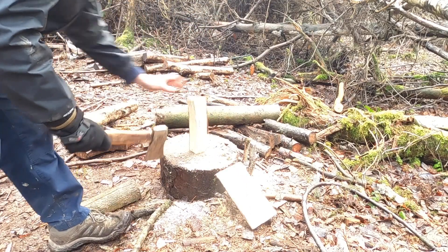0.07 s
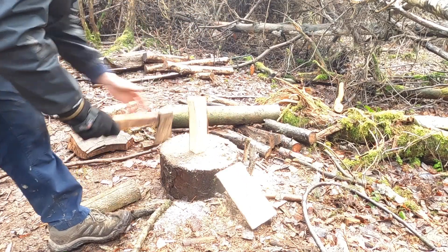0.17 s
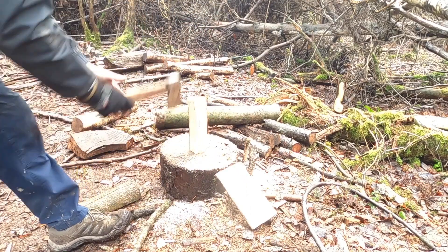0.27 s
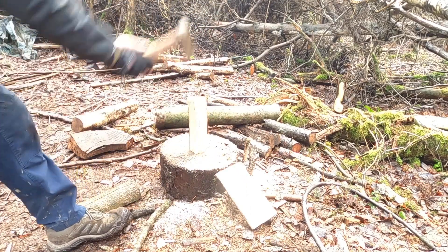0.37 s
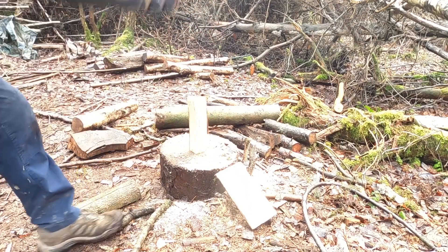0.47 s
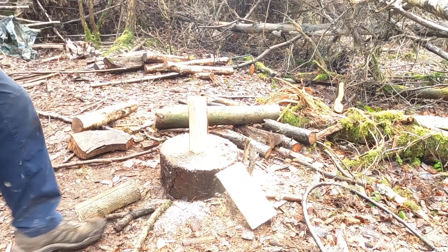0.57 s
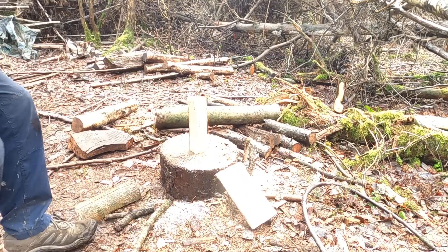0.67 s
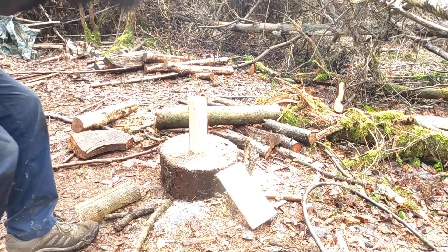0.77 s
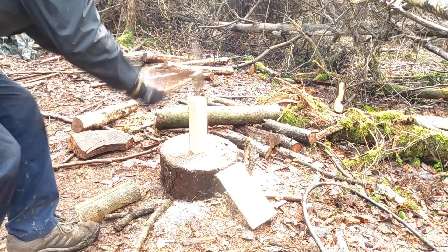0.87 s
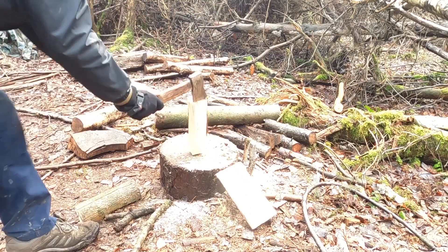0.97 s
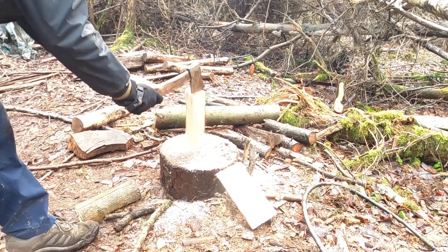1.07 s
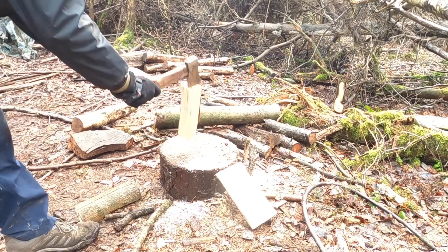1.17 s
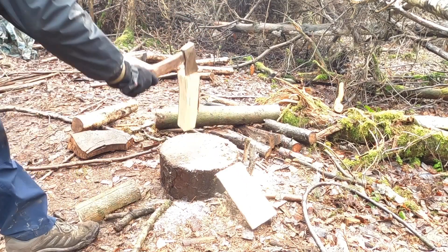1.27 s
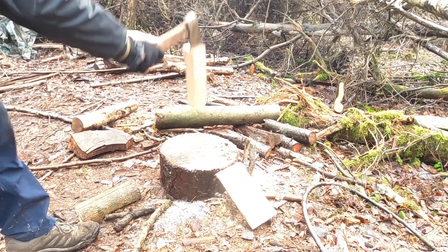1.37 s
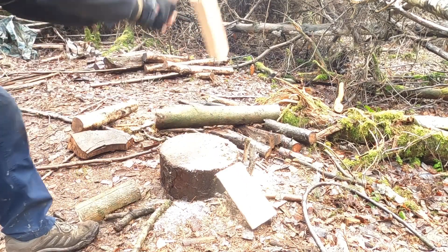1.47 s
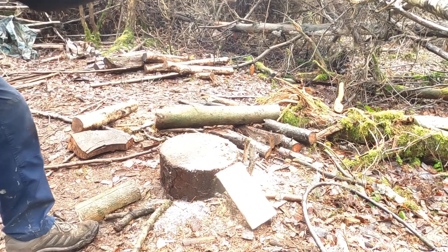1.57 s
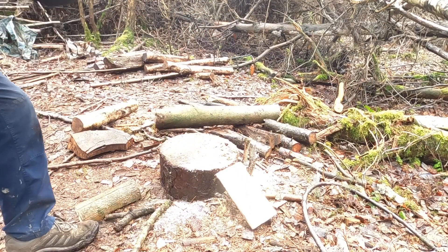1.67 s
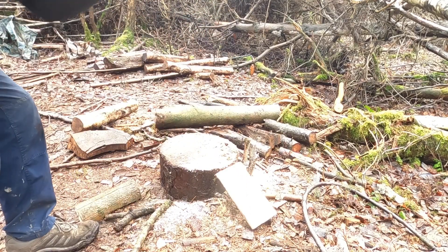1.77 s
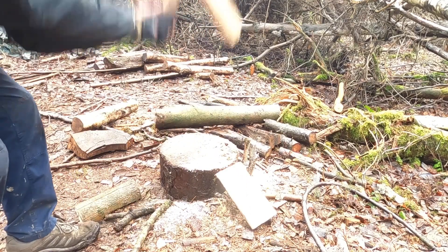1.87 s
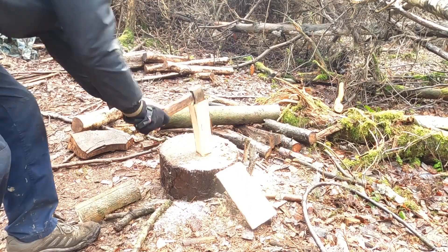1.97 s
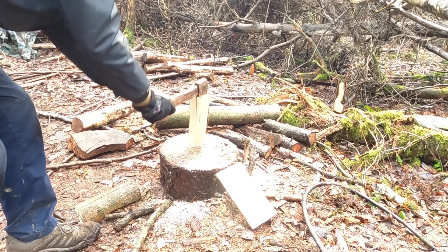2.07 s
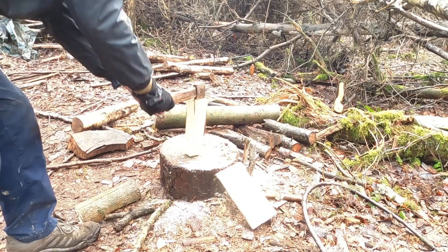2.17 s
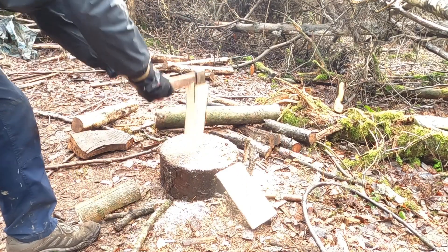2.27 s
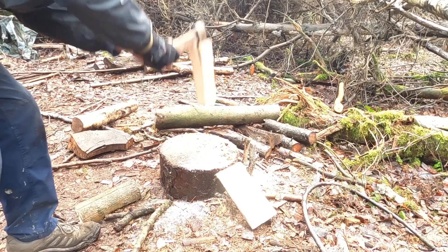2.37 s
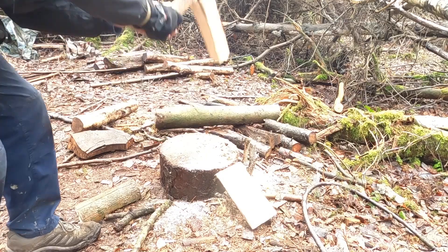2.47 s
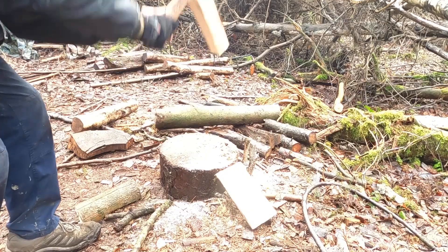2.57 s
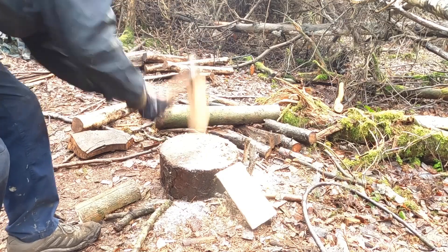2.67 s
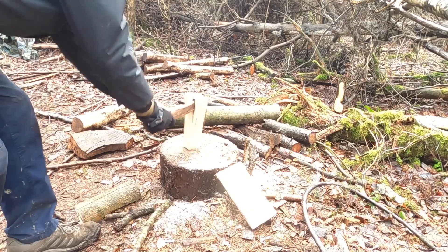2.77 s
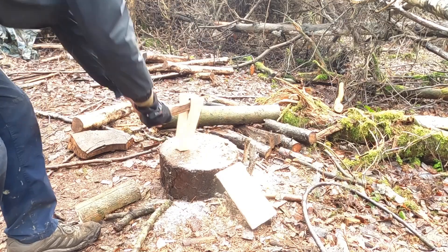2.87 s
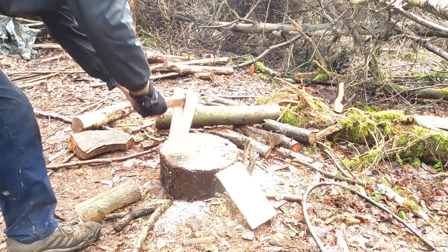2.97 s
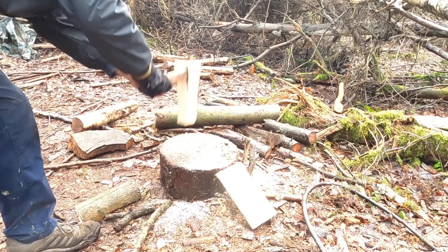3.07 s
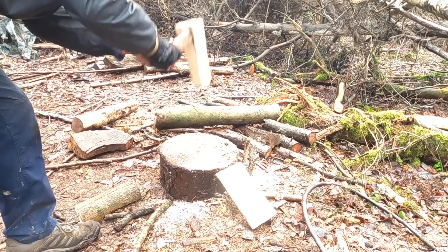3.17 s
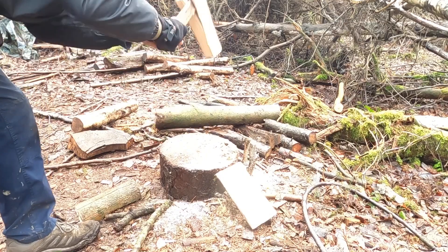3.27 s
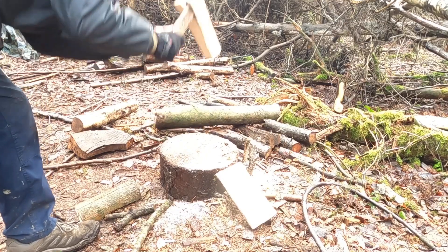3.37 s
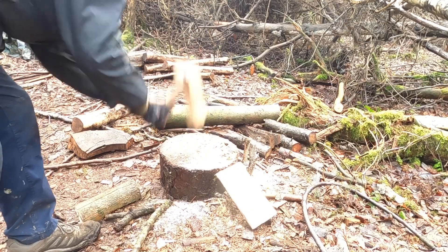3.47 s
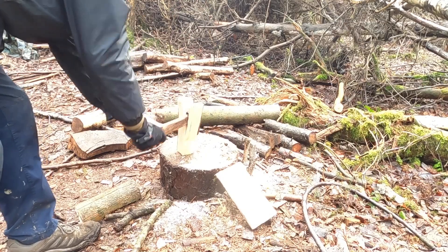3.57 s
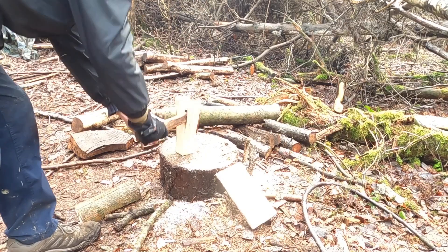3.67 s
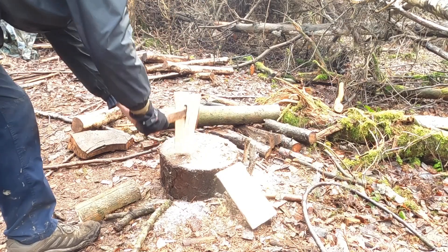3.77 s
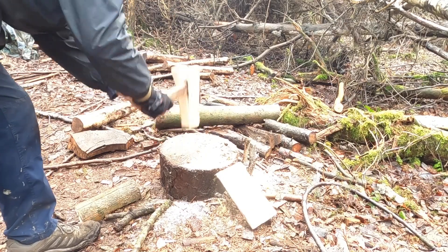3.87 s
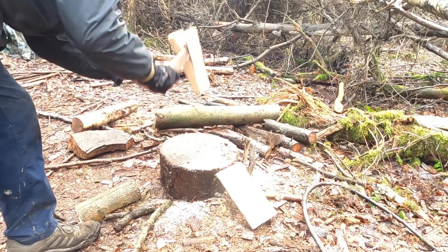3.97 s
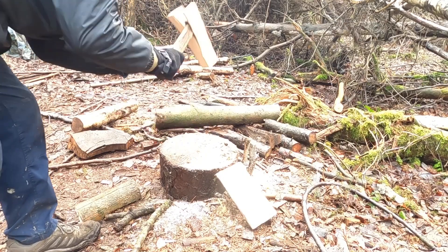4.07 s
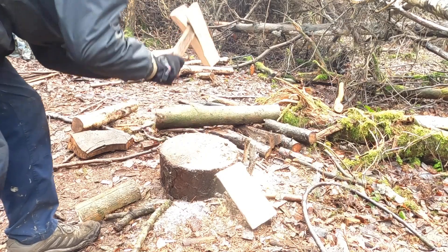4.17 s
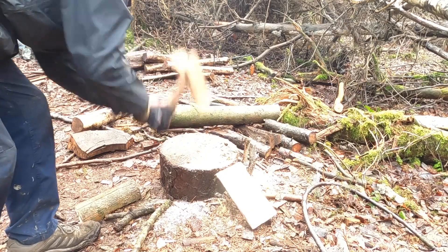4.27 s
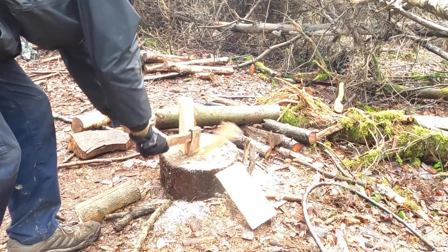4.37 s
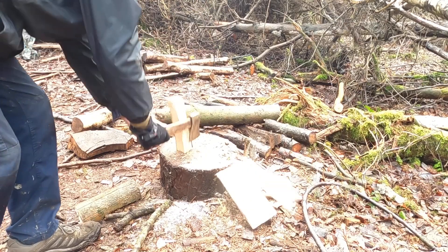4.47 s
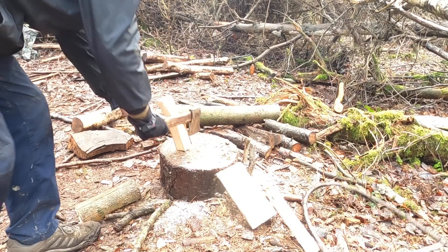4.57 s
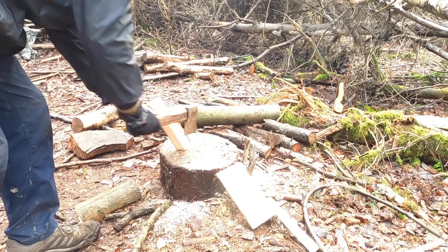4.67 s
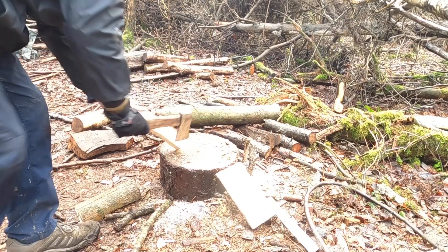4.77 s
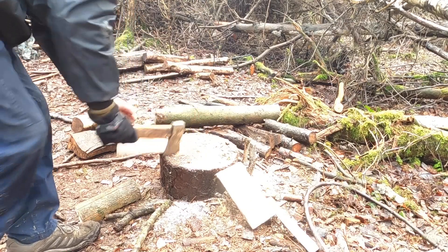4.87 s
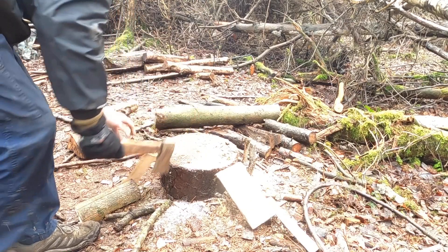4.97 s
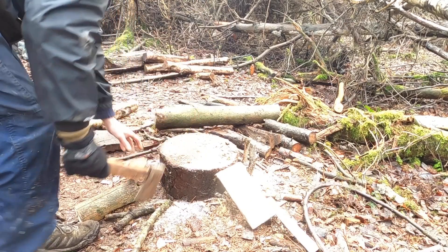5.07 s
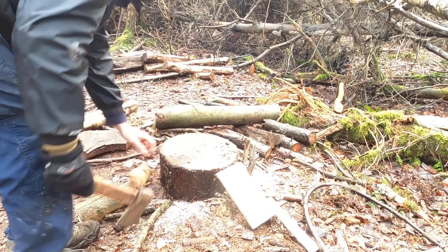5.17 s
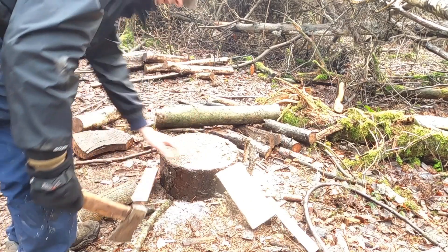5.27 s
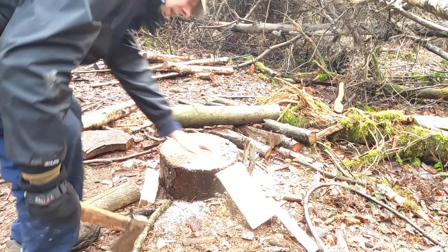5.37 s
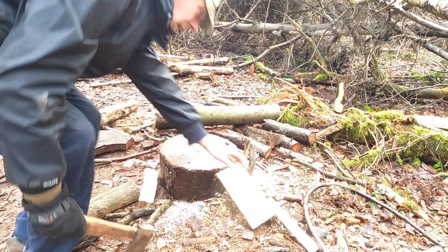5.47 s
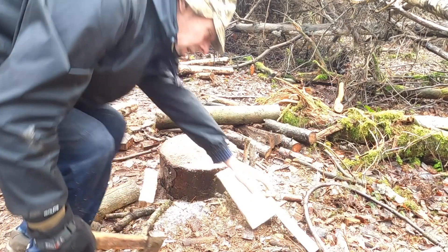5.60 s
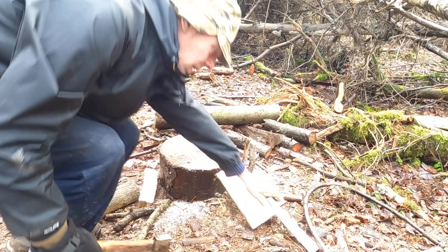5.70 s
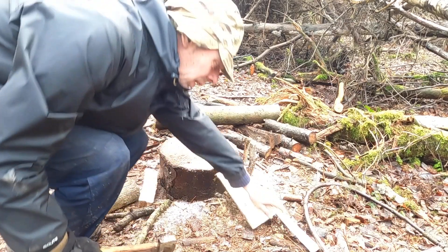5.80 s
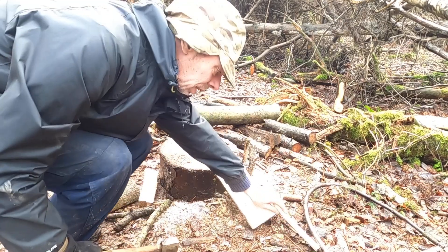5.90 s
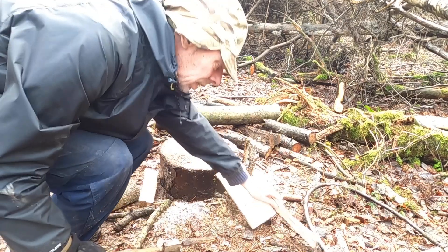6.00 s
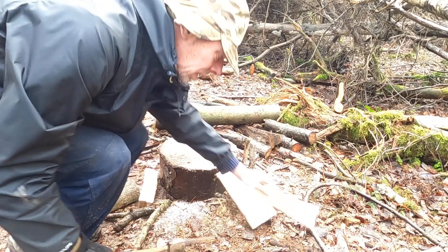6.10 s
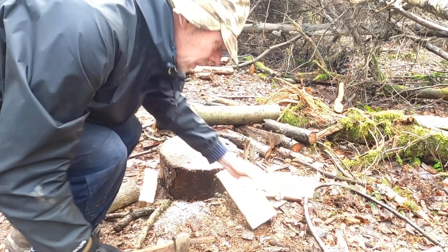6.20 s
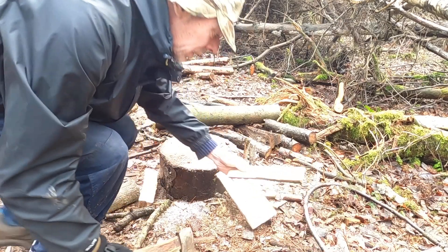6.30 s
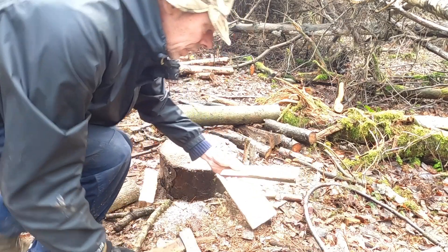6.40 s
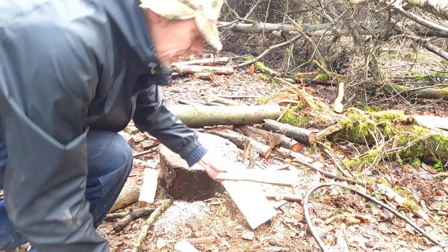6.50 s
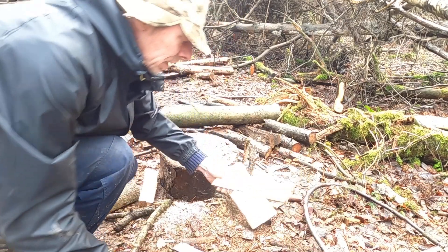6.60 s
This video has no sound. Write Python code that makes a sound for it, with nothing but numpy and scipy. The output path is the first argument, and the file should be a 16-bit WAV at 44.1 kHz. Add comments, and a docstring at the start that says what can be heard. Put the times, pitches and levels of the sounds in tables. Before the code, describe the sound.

Close outdoor sound of an axe splitting dry wood on a log block. A jacket and dead leaves rustle, then five hard, cracking chops fall just under a second apart, each with a low thud and soft return from the trees. After the last, kindling clatters down, the axe is laid aside with a dull knock, and sticks scrape lightly.

```python
"""A jacket and dead leaves rustle over still woodland air and a low rumble, drawn as coloured noise.
An axe then splits a dry billet on a log block: five sharp chops, each a sum of damped modes with a crack of
noise, a thud of the block and a soft return from the trees. Kindling drops and the axe is laid down, as further
damped modes, amid filtered-noise snaps and scrapes. The close microphone overloads on every chop: a limiter
ducks the surroundings for a moment and the remaining peaks are flattened."""
import sys
import numpy as np
from scipy import signal
from scipy.fft import rfft, irfft, next_fast_len
from scipy.io import wavfile
from scipy.ndimage import uniform_filter1d, minimum_filter1d

SR = 44100
rng = np.random.default_rng(int(sys.argv[2]) if len(sys.argv) > 2 else 0)


def master_out(mix):
    """Clip the mix to full scale and print it as 16-bit PCM to the path in sys.argv[1]."""
    frames = np.transpose(np.atleast_2d(mix))
    ceiling = np.clip(frames, -1, 1)
    pcm = np.round(ceiling * 32767).astype(np.int16)
    wavfile.write(sys.argv[1], SR, pcm)


N = 292779

# All levels are relative; the functions that use them may add further gain.
# Shifts of the body: peak t/s, swell/s, fade/s, rustle level/dB, low bump level/dB
BODY_SHIFTS = [(.08, .1, 0.048, -71, -50.5), (0.519, 0.26, 0.17, -61, -43.5),
               (.83, 0.051, 0.062, -58.5, -48), (1.63, 0.039, 0.046, -64, -52),
               (1.85, 0.069, 0.16, -65.5, -51.5), (2.411, 0.095, 0.051, -75, -76),
               (2.93, 0.074, 0.12, -72, -74), (5.33, 0.065, 0.12, -66.5, -57), (5.72, 0.14, 0.15, -67, -54),
               (6, 0.043, 0.036, -81, -47.5), (6.49, 0.048, 0.061, -63, -45)]
# Before each blow the sleeve swells and air is pushed ahead: time constant/s, level/dB
SWING_S, SWING_RUSTLE_DB = 0.044, -62
PUSH_S, PUSH_DB = 0.11, -51.5
# Floors between movements
REST_RUSTLE_DB, REST_RUMBLE_DB = -79, -55.5
# Woodland air over time: t/s, level/dB
AIR_ENVELOPE = [(0, -55.5), (.55, -53), (.87, -53), (1.1, -63), (1.85, -56.5), (2.3, -62.5), (4.2, -65),
                (4.9, -62.5), (5.35, -57.5), (6.64, -57)]
# Noise spectra of cloth and leaves, air, low rumble and breaking wood: f/Hz, level per Hz/dB
RUSTLE_SPECTRUM = [(200, -13.5), (900, 4), (2000, 5), (4000, 0.5), (7700, -1.5), (8300, -12.5),
                   (12000, -22.5), (16000, -44.5)]
AIR_SPECTRUM = [(60, 5.5), (160, 4.5), (350, 3), (1100, 1), (2000, -7), (3500, -13), (8000, -20),
                (16000, -58)]
RUMBLE_SPECTRUM = [(15, -5.5), (35, 4), (65, 2.5), (100, -4.5), (160, -14.5), (300, -23), (1000, -61.5)]
CRACK_SPECTRUM = [(200, 1.5), (700, -6.5), (1500, 10), (4000, 0), (7400, -5), (8600, -14.5), (12000, -21.5),
                  (16000, -41)]
# The two microphone ports: f/Hz, phase by which left lags right/rad, left minus right level/dB
PORT_RESPONSE = [(100, .08, -1), (1000, 0.27, 1.3), (2000, 0.57, 2.34), (4150, 0.7, 2.5), (7000, 0.93, -5),
                 (11900, 1.2, -2.5)]
# Fibres snapping, twigs and leaves ticking: t/s, level/dB, t60/s
SNAP_EVENTS = [(0.311, -44, 0.0089), (2.7207, -2, 0.0045), (2.98, -41, .006), (3.099, -43, 0.0055),
               (3.237, -50, 0.0041), (3.5301, 1.5, 0.0077), (5.095, -47, 0.029), (5.723, -50, .008),
               (5.838, -40, 0.014), (5.893, -47, 0.021), (6.243, -45, 0.012), (6.409, -44, 0.014),
               (6.497, -35, 0.0062), (6.623, -32, 0.0019)]
# A shoe scuffing, wood and steel sliding: t/s, length/s, level/dB, centre f/Hz, width/Hz
SCRAPE_STROKES = [(.41, 0.21, -54, 393, 259), (4.92, 0.029, -55, 6420, 1400),
                  (5.082, 0.061, -60, 3650, 1520), (5.096, 0.26, -63.5, 2663, 257),
                  (5.118, 0.27, -64, 1960, 259), (6.001, 0.01, -60, 1880, 400),
                  (6.002, .05, -66.5, 3200, 396), (6.229, 0.041, -48.5, 2930, 880),
                  (6.26, 0.055, -65, 3330, 890), (6.458, 0.095, -57, 2960, 2500)]
# Axe blows: t/s, blow level/dB, billet f/Hz, ring t60/s, low, middle and upper mode levels/dB,
# crack level/dB, crack t60/s, echo level/dB
AXE_BLOWS = [(0.9012, 16.5, 1815, 0.012, 4, -11.5, 2.5, 6.5, 0.014, 8),
             (1.977, 15.5, 1825, 0.014, 3, -0.5, -4.5, -1.5, 0.018, 4.5),
             (2.7180, 14, 1900, 0.0093, 0, 1, -11, 0.5, 0.018, 3.5),
             (3.5290, 12, 1947, 0.015, -1, -2.5, 2.5, 2.5, 0.013, 8),
             (4.342, 7.5, 2045, 0.017, 6.5, 4, -8.5, 0, 0.014, 8)]
# Billet modes: frequency ratio, level/dB, share of the ring t60
BILLET_MODES = [(.53, -9, .8), (.63, -7.5, 0.93), (.72, -7, 0.88), (.82, -5, 0.89), (1, -1, .88),
                (1.14, -7, 0.88), (1.31, -14.5, 0.923), (1.78, -15.5, .7), (2.07, -14, 0.5),
                (2.55, -14, .5), (3.3, -23, 0.49)]
# Weight landing on block or ground: t/s, level/dB, f/Hz, t60/s, overtone level/dB, crunch level/dB
LANDINGS = [(0.9055, 2.5, 82.4, 0.074, -9, -13.5), (0.964, -23.5, 80.7, 0.19, -20, -49),
            (1.978, -9, 89.6, 0.11, 3.5, -16.5), (2.719, -14.5, 84.7, 0.11, 6.5, -19),
            (3.5311, -11.5, 94.6, 0.12, 1, -14), (4.3444, -8, 89, 0.091, 1, -15),
            (4.573, -31.5, 94.8, 0.075, -20, -37.5), (4.985, -25, 67, 0.063, -26, -68)]
# Modes of the block on soft ground: frequency ratio, level/dB, share of the t60
BLOCK_MODES = [(1, -0.5, 0.96), (2.05, 1, 0.39), (2.7, -1, 0.54), (3.8, -6, 0.36), (5.2, 0.5, 0.21)]
# Scatter from the trees: f/Hz, level/dB, t60/s
TREE_BANDS = [(350, -17, 1.2), (697, -12.5, 1.1), (1240, -10.5, 1.3), (1900, -4, 1.16), (3180, -14.5, 0.84),
              (4690, -22.5, 0.95), (6020, -36, 1.6)]
# Lighter knocks: t/s, thud level/dB, thud f/Hz, stick level/dB, brightest f/Hz, fall-off/(dB per octave),
# stick frequency factor, axe level/dB, tick level/dB
KNOCK_EVENTS = [(2.884, -24.5, 264, -39.5, 1560, 4, .9, -57, -43),
                (3.682, -24, 254.5, -36.5, 1173, 5.5, .9, -83.5, -53),
                (4.371, -8.5, 192.6, -18.5, 900, 7, 1.26, -44, -46),
                (4.544, -17.5, 450, -14, 1255, 6, 1.012, -69, -23.5),
                (4.671, -33.5, 405, -25, 1370, 15.5, 1.05, -75.5, -43.5),
                (4.9789, -43.5, 390, -26.5, 2150, 15, 1.34, -73.5, -38.5),
                (5.214, -30, 470, -50.5, 580, 7.5, 1.6, -62.5, -63),
                (5.278, -20.5, 313, -28, 716, 16, 0.81, -42, -45),
                (6.002, -31.5, 354, -41, 1970, 14, 1.34, -64.5, -61),
                (6.248, -71.5, 300, -33, 2700, 19, 1, -75.5, -45)]
# Modes of a loose stick: f/Hz, level/dB, t60/s
STICK_MODES = [(541.6, -6.5, 0.06), (589.6, -4.5, 0.09), (1028, -1, 0.022), (1101.7, -3.5, 0.02),
               (1392, -8, 0.029), (1596, -7.5, 0.026), (2326, -4, 0.025), (2740, -14, 0.037),
               (3050, -10, 0.05), (3548, -12.5, 0.041), (4870, -38, 0.019)]
# Modes of axe head and handle: f/Hz, level/dB, t60/s
AXE_MODES = [(540, -7, 0.11), (755, 7.5, 0.07), (1850, 3, 0.12), (1917, -0.5, .05), (2060, 1, 0.11),
             (2710, -17.5, 0.062)]
CUTOFF_HZ = 16200  # stopband edge of the final low-pass


def from_db(db):
    """Amplitude ratio: 20 dB is a factor of ten."""
    return 10 ** (np.asarray(db) / 20)


def rms_one(x):
    """Normalisation to unit root-mean-square."""
    return x / np.sqrt(np.mean(x ** 2) + 1e-20)


def ages():
    """Time axis of half a second from the onset of an event."""
    return np.arange(SR // 2) / SR


def fade(t60):
    """Exponential decay: the amplitude falls by 60 dB in t60."""
    return 1000.0 ** (-ages() / t60)


def ring(hz, t60):
    """Free vibration of one struck mode: a damped sinusoid."""
    return np.sin(2 * np.pi * hz * ages()) * fade(t60)


def add(track, s, sound):
    """Superposition: a sound is summed into the track from time s."""
    start = int(round(s * SR))
    track[start:start + len(sound)] += sound[:N - start]


def band_pass(x, low_hz, high_hz):
    """Band limitation by a Butterworth filter."""
    band = [low_hz, min(high_hz, .45 * SR)]
    return signal.sosfilt(signal.butter(2, band, "band", fs=SR, output="sos"), x)


def noise(spectrum, size=N):
    """Spectral shaping: white noise is weighted by a level curve over log frequency, then set to rms 1."""
    hz, db = np.transpose(spectrum)
    freqs = np.maximum(np.fft.rfftfreq(size, 1 / SR), 1)
    weight = from_db(np.interp(np.log(freqs), np.log(hz), db))
    white = rng.standard_normal(size)
    return rms_one(irfft(rfft(white) * weight, size))


def drift(rate):
    """Random modulation: straight lines join unit-variance values drawn at this rate per second."""
    return np.interp(np.arange(N) / SR * rate, np.arange(N // 10), rng.standard_normal(N // 10))


def burst(t60):
    """Fracture: breaking wood fibres give broadband noise with exponential decay."""
    return noise(CRACK_SPECTRUM, size=SR // 2) * fade(t60)


def at_ports(x):
    """Interaural-type difference: the left port lags in phase and the housing colours each side."""
    hz, lag, tilt_db = np.transpose(PORT_RESPONSE)
    size = next_fast_len(N + SR // 10)
    freqs = np.fft.rfftfreq(size, 1 / SR)
    # each port takes half the difference, with opposite sign
    gain = from_db(np.interp(freqs, hz, tilt_db) / 2)
    left = gain * np.exp(-.5j * np.interp(freqs, hz, lag))
    return irfft(rfft(x, size) * np.array([left, 1 / left]), size)[:, :N]


def spread(spectrum, width):
    """Partial coherence: a common noise plus an independent one in opposite phase at the two ports."""
    common = at_ports(noise(spectrum))
    return common + width * noise(spectrum) * np.array([[1], [-1]])


def swell_at(s, rise_s, fall_s):
    """Gaussian envelope of height 1 with separate widths before and after its peak."""
    t = np.arange(N) / SR - s
    return np.exp(-.5 * (t / np.where(t < 0, rise_s, fall_s)) ** 2)


def movement(stop_s=.01):
    """Power addition: rest, shifts of the body and swings set the rustle and rumble amplitudes."""
    rustle_power = from_db(REST_RUSTLE_DB) ** 2
    rumble_power = from_db(REST_RUMBLE_DB) ** 2
    for s, rise_s, fall_s, rustle_db, bump_db in BODY_SHIFTS:
        shape = swell_at(s, rise_s, fall_s)
        rustle_power = rustle_power + (from_db(rustle_db) * shape) ** 2
        rumble_power = rumble_power + (from_db(bump_db) * shape) ** 2
    for s, *_ in AXE_BLOWS:
        sleeve = swell_at(s, SWING_S, stop_s)
        push = swell_at(s, PUSH_S, stop_s)
        rustle_power = rustle_power + (from_db(SWING_RUSTLE_DB) * sleeve) ** 2
        rumble_power = rumble_power + (from_db(PUSH_DB) * push) ** 2
    return np.sqrt(rustle_power), np.sqrt(rumble_power)


def surroundings(rustle_db=7, air_db=1, rumble_db=1, grain_db=2.5, flutter_db=2.0, lump_db=4.0,
                 crackles_per_s=60, crackle_db=-10, sheen_db=-15, sheen_hz=10000):
    """Friction noise of jacket and leaves, in grains and stray crackles, over still air and a lumpy rumble."""
    moving, low = movement()
    still = np.interp(np.arange(N) / SR, *np.transpose(AIR_ENVELOPE))
    grain = from_db(grain_db * drift(900) + flutter_db * drift(45))
    cloth = grain * spread(RUSTLE_SPECTRUM, width=.5)
    creases = rng.standard_normal(N) * (rng.random(N) < crackles_per_s / SR)
    crackle = at_ports(rms_one(signal.fftconvolve(creases, burst(.008))[:N]))
    rustle = moving * from_db(rustle_db) * (cloth + from_db(crackle_db) * crackle)
    # harder rubbing is brighter: the sheen grows faster than the rustle
    treble = band_pass(rng.standard_normal(N), sheen_hz / 1.2, sheen_hz * 1.2)
    sheen = at_ports(rms_one(treble))
    sheen_level = moving * np.sqrt(moving / moving.max())
    rustle = rustle + sheen_level * from_db(sheen_db + flutter_db * drift(45)) * sheen
    air = from_db(still + air_db) * spread(AIR_SPECTRUM, width=0.25)
    rumble = low * from_db(rumble_db + lump_db * drift(22)) * spread(RUMBLE_SPECTRUM, width=0.26)
    return (rustle + air + rumble) * from_db([[1.1], [-1.1]])  # left louder than right


def snaps(low_hz=1400, high_hz=9000):
    """Brittle fracture: single fibres and twigs give way in short band-limited bursts."""
    out = np.zeros(N)
    for s, db, t60 in SNAP_EVENTS:
        add(out, s, from_db(db) * burst(t60))
    return band_pass(out, low_hz, high_hz)


def scrapes(slips_per_s=900):
    """Stick-slip friction: tiny random slips excite a resonance while the stroke swells and fades."""
    out = np.zeros(N)
    for s, length, db, hz, width in SCRAPE_STROKES:
        slips = rng.standard_normal(SR // 2) * (rng.random(SR // 2) < slips_per_s / SR)
        edge_ratio = 1 + width / hz / 2
        rub = rms_one(band_pass(slips + 1e-18, hz / edge_ratio, hz * edge_ratio))
        stroke = np.sin(np.pi * np.minimum(ages() / length, 1))
        add(out, s, from_db(db) * rub * stroke)
    return out


def lead_in(x, rasp_db=-29, rasp_low_hz=600, rasp_high_hz=1200, low_hz=700, high_hz=5000):
    """Time-reversed convolution: a faint tick and thin rasp precede the sound, thickening each attack."""
    lead_s, tick_db, rise_s = .0105, -19, .008
    swell = band_pass(rng.standard_normal(SR // 2), rasp_low_hz, rasp_high_hz) * np.exp(-ages() / rise_s)
    swell *= from_db(rasp_db) / np.sqrt(np.sum(swell ** 2))
    add(swell, lead_s, from_db([tick_db]))
    ahead = signal.fftconvolve(band_pass(x, low_hz, high_hz), swell[None, ::-1], axes=1)
    return x + ahead[:, -N:]  # the last N samples place the response before its source


def chops(splinter_db=-33, splinter_t60=0.13, bite_s=0.00095, low_hz=750, high_hz=7000):
    """Impact excitation: the blade bites, sets the billet's modes ringing briefly and tears its fibres."""
    out = np.zeros(N)
    bite = 1 - np.exp(-ages() / bite_s)
    for s, db, hz, t60, low_db, middle_db, upper_db, crack_db, crack_t60, echo_db in AXE_BLOWS:
        billet = 0
        for k, (ratio, level_db, share) in enumerate(BILLET_MODES):
            # where the blade sits decides which modes it drives
            drive_db = np.interp(ratio, [.55, .79, 1, 1.8], [low_db, middle_db, 0, upper_db])
            mode = ring(hz * ratio, t60 * share)
            billet = billet + (-1) ** k * from_db(level_db + drive_db) * mode
        billet = band_pass(billet, low_hz, high_hz)  # a slim billet radiates little bass
        crack = burst(crack_t60) + from_db(splinter_db) * burst(splinter_t60)
        blow = from_db(db) * billet + from_db(crack_db) * crack
        add(out, s, blow * bite)
    return out


def thuds(low_hz=52, high_hz=520, crunch_t60=0.075):
    """Mass on a soft support: the ground keeps the block's modes dull; bark and soil crunch under it."""
    out = np.zeros(N)
    for s, db, hz, t60, overtones_db, crunch_db in LANDINGS:
        block = 0
        for k, (ratio, level_db, share) in enumerate(BLOCK_MODES):
            mode_db = level_db + overtones_db * (k > 0)
            block = block + from_db(mode_db) * ring(hz * ratio, t60 * share)
        crunch = rms_one(band_pass(rng.standard_normal(SR // 2), 210, 940)) * fade(crunch_t60)
        add(out, s, from_db(db) * block + from_db(crunch_db) * crunch)
    return band_pass(out, low_hz, high_hz)


def nearby(x, scatter_db=-19, t60=0.018):
    """Early scattering: logs and ground close by return a brief response, different at each port."""
    scatter = rng.standard_normal((2, SR // 2)) * fade(t60)
    scatter *= from_db(scatter_db) / np.sqrt(np.sum(scatter ** 2, axis=1, keepdims=True))
    return signal.fftconvolve(scatter, x[None], axes=1)[:, :N]


def woodland(light, build_s=0.06, width=.5, patchy_db=1.0, band_ratio=1.222, light_db=-16):
    """Diffuse scattering: countless trunks return a wash that builds up, then decays at a rate set per band."""
    sent = from_db(light_db) * light
    for s, *_, echo_db in AXE_BLOWS:
        add(sent, s, from_db([echo_db]))  # each chop is sent as one impulse
    t = np.arange(N) / SR
    echo = np.zeros((2, N))
    for hz, db, t60 in TREE_BANDS:
        band = band_pass(rng.standard_normal((2, N)), hz / band_ratio, hz * band_ratio)
        decay = np.exp(-np.log(1000) * t / t60)
        shape = (1 - np.exp(-t / build_s)) * decay * from_db(patchy_db * drift(24))
        echo += from_db(db) * band * shape / np.sqrt(np.sum(shape ** 2))
    mid, side = signal.fftconvolve(echo, sent[None], axes=1)[:, :N]
    return at_ports(mid) + width * side * np.array([[1], [-1]])


def knocks(thud_cycles=5.18, tick_t60=0.045, tick_low_hz=500, tick_high_hz=7500):
    """Contact filtering: wood drops with a dead thud; modes near the contact's brightest f ring most."""
    out = np.zeros(N)
    axe = sum(from_db(db) * ring(hz, t60) for hz, db, t60 in AXE_MODES)
    for s, thud_db, thud_hz, stick_db, bright_hz, fall_db, pitch, axe_db, tick_db in KNOCK_EVENTS:
        stick = 0
        for k, (hz, db, t60) in enumerate(STICK_MODES):
            octaves_away = abs(np.log2(hz * pitch / bright_hz))
            mode_db = db - fall_db * octaves_away
            stick = stick + (-1) ** k * from_db(mode_db) * ring(hz * pitch, t60)
        thud = ring(thud_hz, thud_cycles / thud_hz)
        tick = band_pass(burst(tick_t60), tick_low_hz, tick_high_hz)
        knock = from_db(stick_db) * stick - from_db(thud_db) * thud
        knock = knock + from_db(axe_db) * axe + from_db(tick_db) * tick
        add(out, s, knock)
    return out


def scene():
    """Superposition of direct sound, early scatter, woodland return and surroundings."""
    light = knocks() + scrapes()
    wood = chops() + thuds() + snaps() + light
    return at_ports(wood) + nearby(wood) + woodland(light) + surroundings()


def limiter(x, ceiling_db=1.5, release_db_per_s=65, ahead_s=0.0017):
    """Peak limiting: the gain drops just ahead of a peak and creeps back linearly in dB."""
    peak_db = 20 * np.log10(np.abs(x).max(axis=0) + 1e-9)
    over = np.maximum(peak_db - ceiling_db, 0)
    ramp = release_db_per_s * np.arange(N) / SR
    cut = np.maximum.accumulate(over + ramp) - ramp
    reach = 2 * int(ahead_s * SR) + 1  # samples, centred on the peak
    gain_db = uniform_filter1d(minimum_filter1d(-cut, reach), reach)
    return x * from_db(gain_db)


def record(dry):
    """Overload and band limitation: limiter, lead-in, flattened peaks, then a steep low-pass."""
    clipped = np.clip(lead_in(limiter(dry)), -1, 1)
    return signal.sosfilt(signal.cheby2(14, 60, CUTOFF_HZ, fs=SR, output="sos"), clipped)


dry = scene()
out = record(dry)
master_out(out)
```